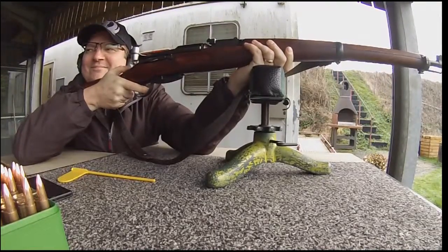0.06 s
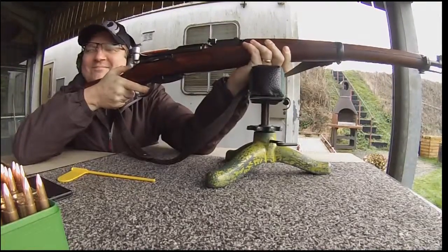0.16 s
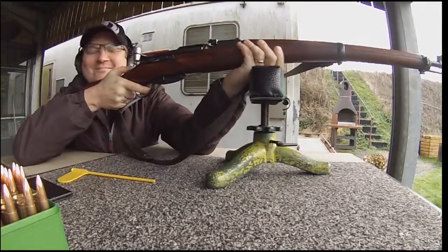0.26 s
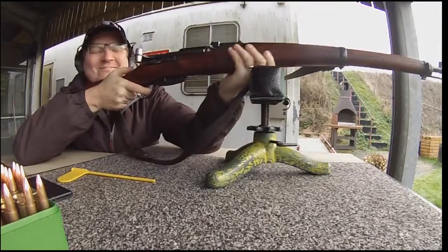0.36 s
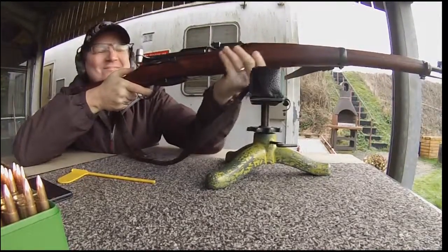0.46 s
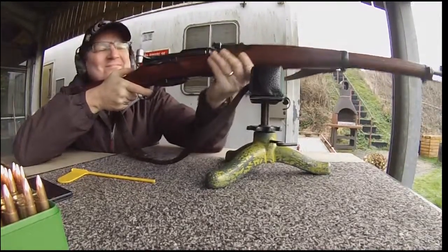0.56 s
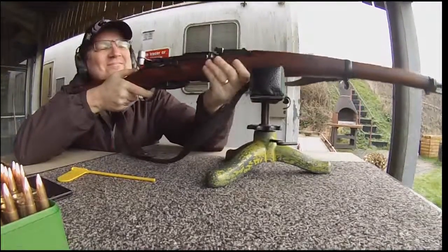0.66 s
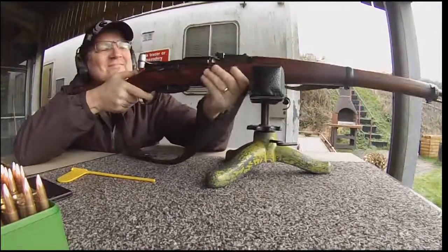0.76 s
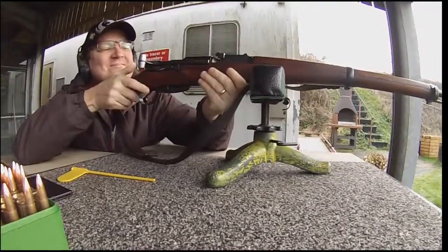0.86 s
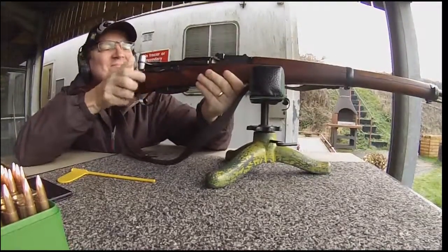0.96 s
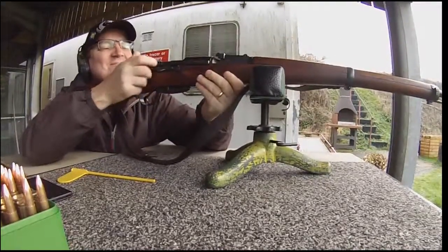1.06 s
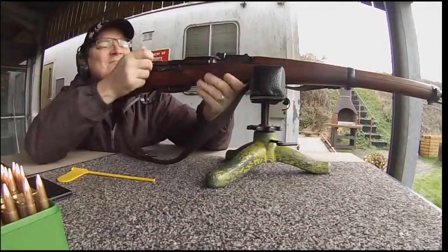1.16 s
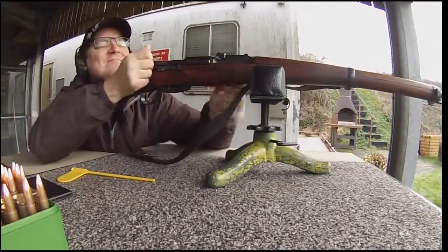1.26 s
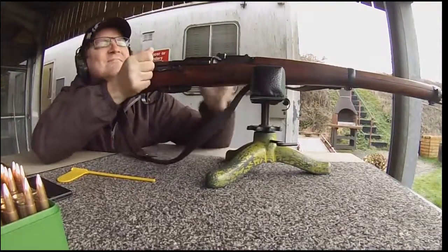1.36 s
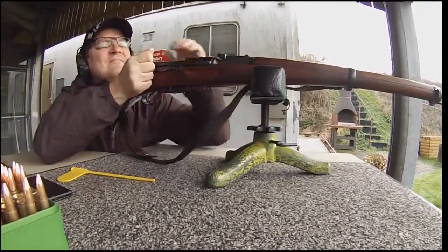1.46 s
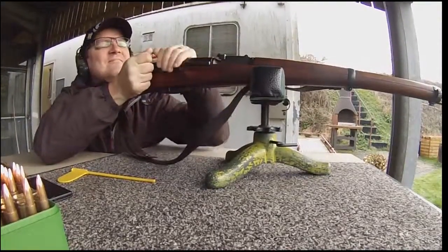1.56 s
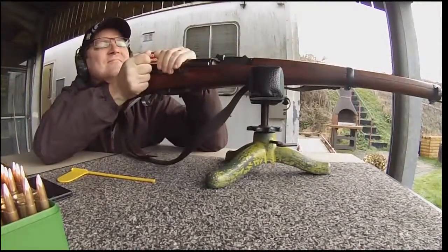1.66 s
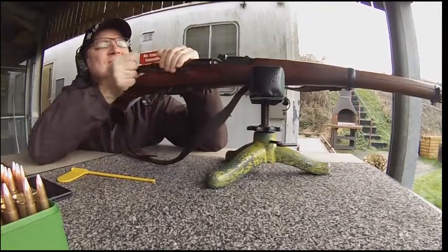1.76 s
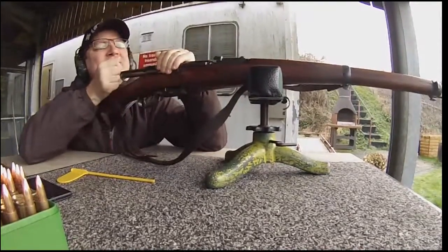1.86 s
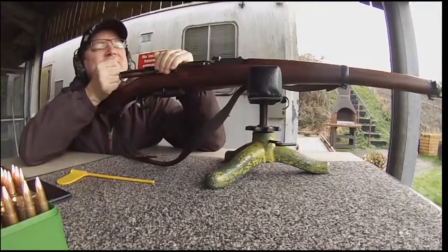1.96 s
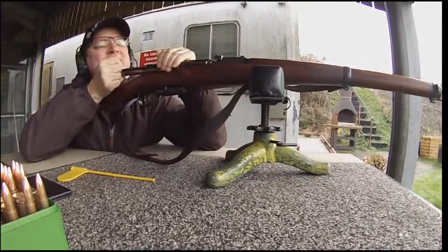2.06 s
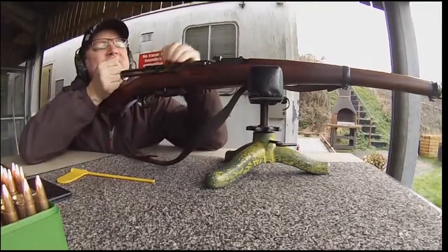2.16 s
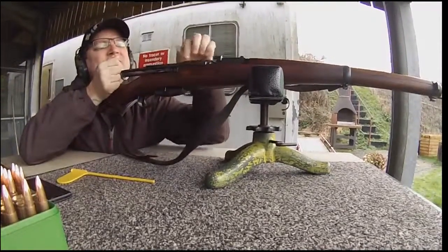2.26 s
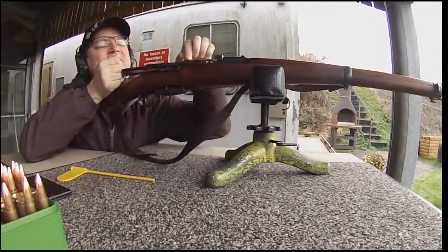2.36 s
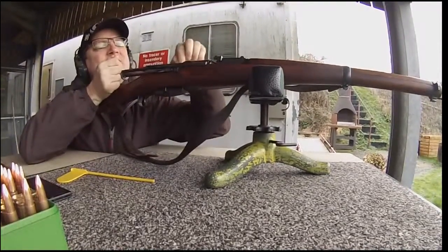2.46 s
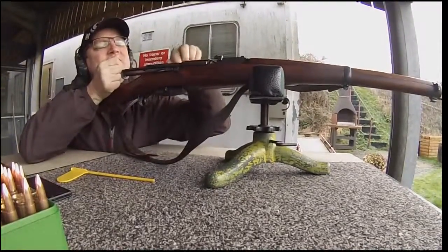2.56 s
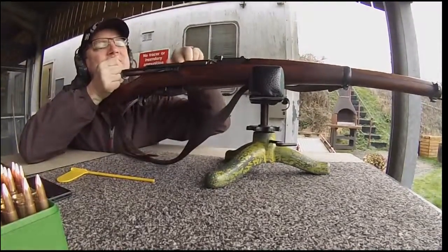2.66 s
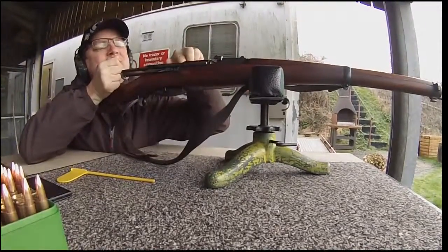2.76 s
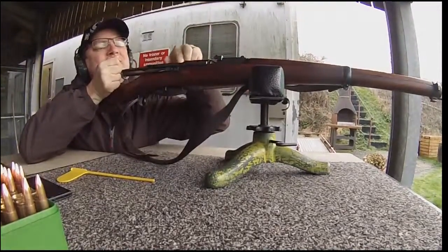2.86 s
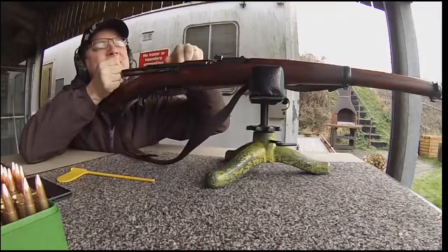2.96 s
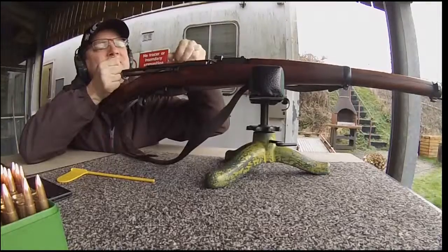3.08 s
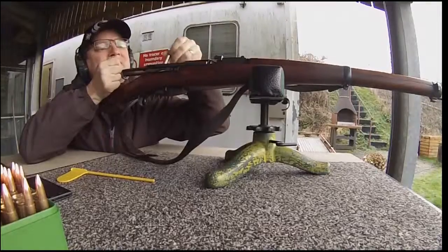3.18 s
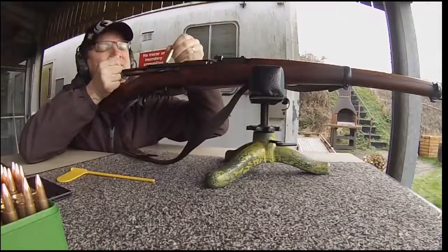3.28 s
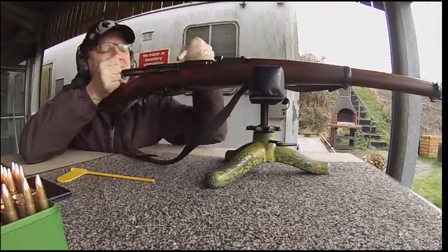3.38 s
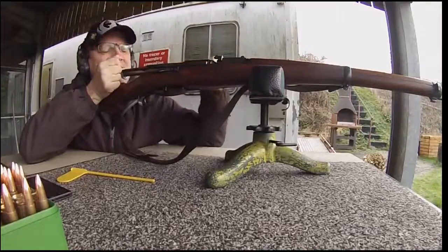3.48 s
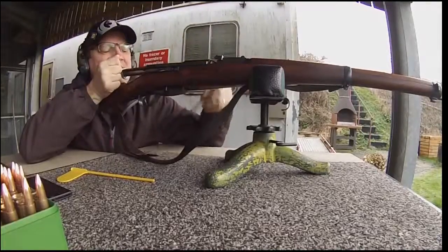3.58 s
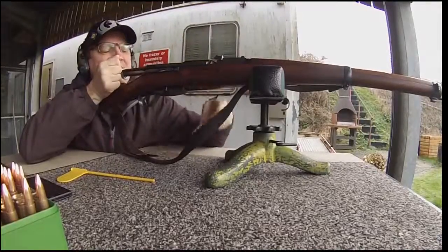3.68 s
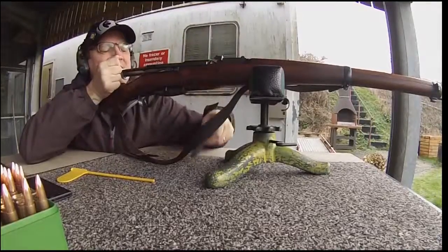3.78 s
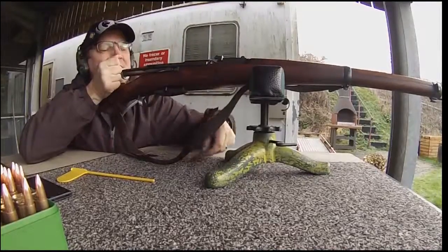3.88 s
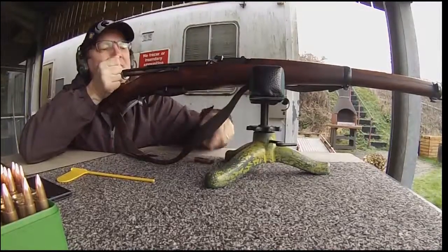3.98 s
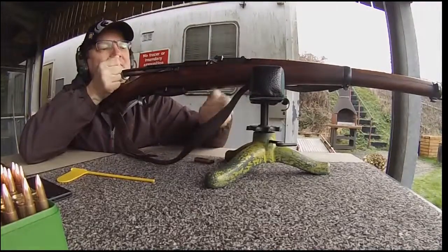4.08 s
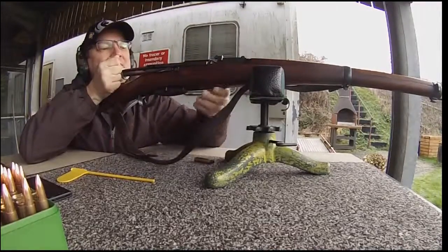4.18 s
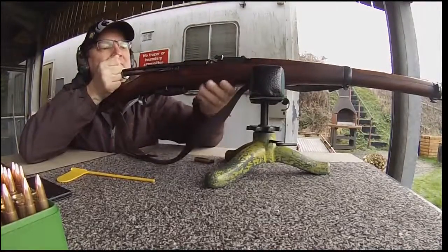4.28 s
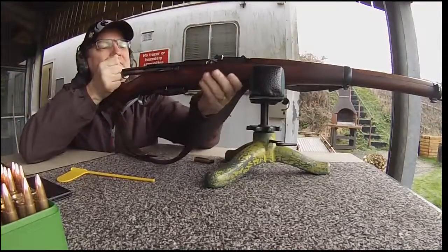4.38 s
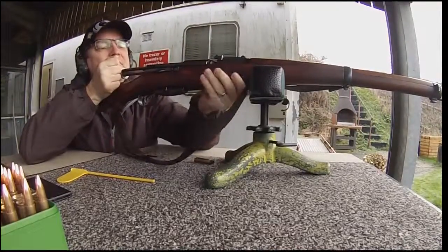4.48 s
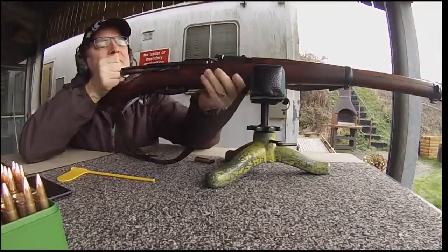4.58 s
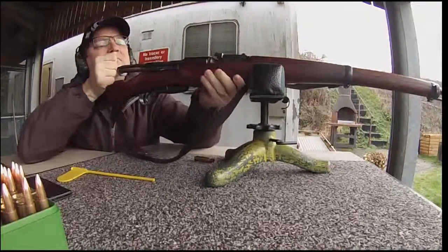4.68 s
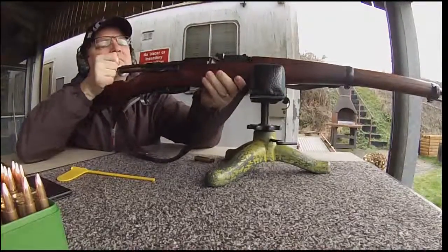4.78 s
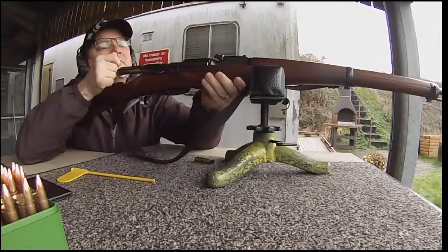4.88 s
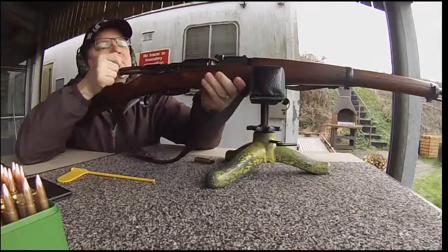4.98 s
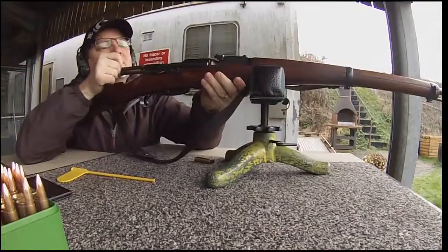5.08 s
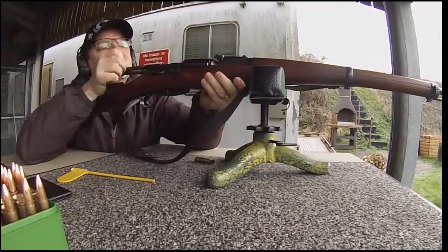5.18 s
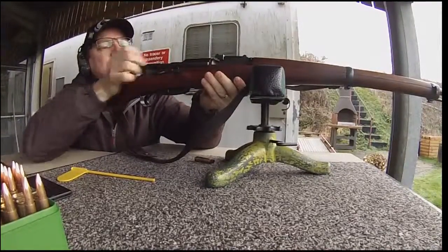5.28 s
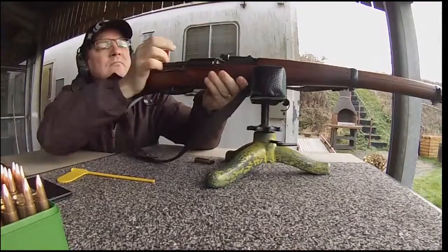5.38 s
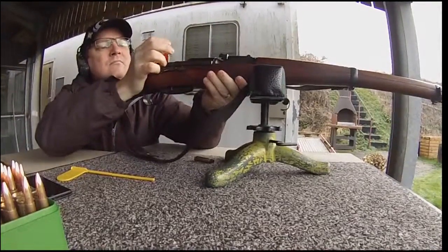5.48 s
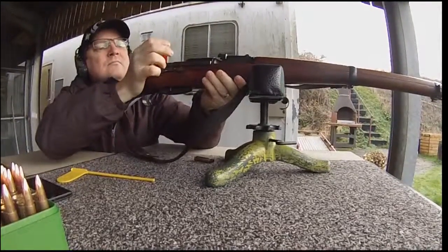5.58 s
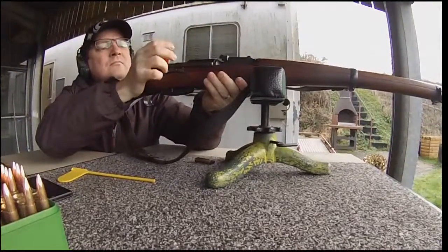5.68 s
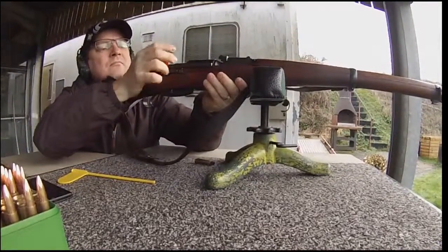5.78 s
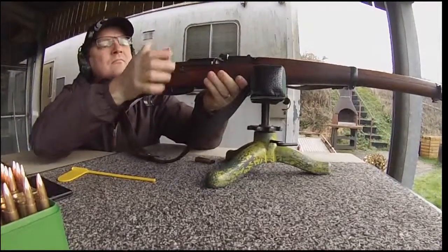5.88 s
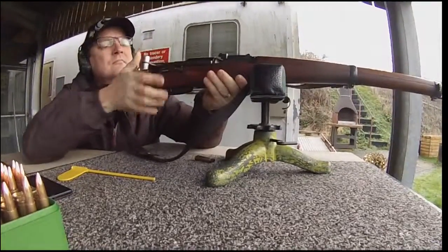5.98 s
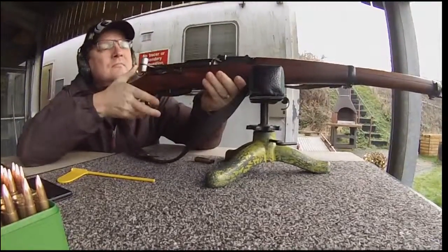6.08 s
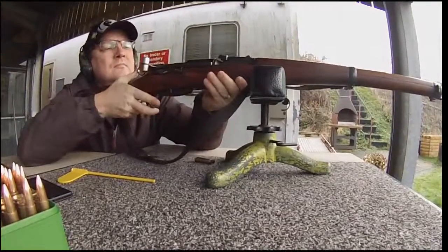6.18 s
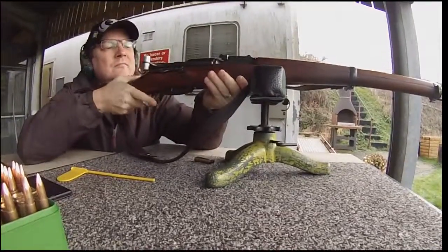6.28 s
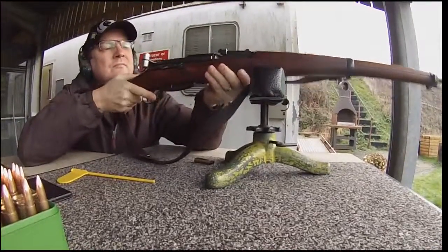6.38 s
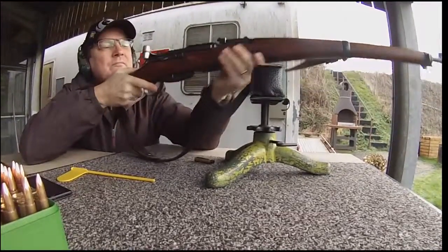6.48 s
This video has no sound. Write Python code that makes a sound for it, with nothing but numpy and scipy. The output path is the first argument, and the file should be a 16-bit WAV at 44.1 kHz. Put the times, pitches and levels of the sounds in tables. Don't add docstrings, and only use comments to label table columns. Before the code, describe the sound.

A rifle bolt clacks back sharply, thin brass rings, a distant shot rolls away, then the bolt slams home and locks amid hollow bench knocks.

```python
import sys
import numpy as np
from scipy import signal
from scipy.fft import rfft, irfft
from scipy.io import wavfile
from scipy.ndimage import uniform_filter1d

SR = 44100
rng = np.random.default_rng(int(sys.argv[2]) if len(sys.argv) > 2 else 0)


def magnitude_from_level(level_db):
    exponent = np.asarray(level_db, float) / 20
    return 10 ** exponent


def unload_wav(signal):
    wavfile.write(
        sys.argv[1],
        SR,
        np.round(np.clip(np.atleast_2d(signal).T, -1, 1) * 32767).astype(np.int16),
    )


N = 288237
T = np.arange(N) / SR


def unit(x):
    return x / np.sqrt(np.mean(x ** 2))


def band(x, hz, width):
    return signal.lfilter(*signal.iirpeak(hz, hz / width, SR), x)


def colour(x, peaks):
    total = 0
    for hz, width, db in peaks:
        once = band(x, hz, width)
        twice = band(once, hz, width)
        total = total + magnitude_from_level(db) * band(twice, hz, width)
    return total


def ring(x, modes):
    total = 0
    for hz, db, t60 in modes:
        pole = np.exp(2j * np.pi * hz / SR - np.log(1000) / (t60 * SR))
        total = total + magnitude_from_level(db) * signal.lfilter([1], [1, -pole], x).imag
    return total


def add(out, s, x, db):
    i = int(s * SR)
    out[i:i + len(x)] += (x * magnitude_from_level(db) / np.abs(x).max())[:N - i]


def walk(rate):
    hold = int(SR / rate)
    levels = np.repeat(rng.standard_normal(N // hold + 1), hold)
    return uniform_filter1d(levels, hold)[:N]


def swell(s, db, rise_s, fall_s):
    return magnitude_from_level(db - 20 * np.maximum((s - T) / rise_s, (T - s) / fall_s))


# frequency in Hz, density in dB per Hz.
HISS = [(15, -28.5), (25, 9.5), (55, -5.5), (249, -4.5), (624, -11), (988, -12.5), (1230, -16), (1940, -15),
        (2410, -18), (3340, -20), (4490, -23), (13600, -30.5), (16000, -60)]


def hiss():
    hz, db = np.transpose(HISS)
    f = np.fft.rfftfreq(N, 1 / SR) + 1
    shape = magnitude_from_level(np.interp(np.log(f), np.log(hz), db))
    return magnitude_from_level(-61) * unit(irfft(rfft(rng.standard_normal(N)) * shape, N))


# time in seconds, sway in dB, boom in dB.
SHOVES = [(.05, -72, -58), (.53, -40, -41), (0.648, -39, -35.5), (.76, -46.5, -62), (1.58, -42.5, -48),
          (1.8, -45, -45), (1.979, -33, -36.5), (2.11, -50, -41), (2.279, -40, -34.5), (2.42, -50.5, -44),
          (4.642, -42, -40.5), (4.769, -35, -33.5), (4.89, -57, -42.5), (5.2, -51, -67.5),
          (5.37, -54, -38.5), (5.43, -47, -46.5), (5.572, -36, -31.5), (5.68, -37, -38), (5.84, -33, -32.5),
          (5.941, -43, -35.5), (6.06, -31.5, -31.5), (6.209, -36.5, -39.5), (6.36, -54, -47.5)]
# time in seconds, level in dB.
REST_ROCKS = [
    (0.049, -43.5),
    (.19, -49.5),
    (.9, -51),
    (1.42, -54),
    (1.9, -34),
    (5.2, -57),
    (5.37, -40),
    (5.44, -40),
]
# frequency in Hz, width in Hz.
BOARD_BANDS = [(47, 26), (115, 40)]


def bench():
    rise_s, sway_fall_s, boom_fall_s, rest_fall_s = 0.017, 0.16, 0.083, 0.043
    sway = magnitude_from_level(-65) + sum(swell(s, db, rise_s, sway_fall_s) for s, db, _ in SHOVES)
    boom = magnitude_from_level(-68.5) + sum(swell(s, db, rise_s, boom_fall_s) for s, _, db in SHOVES)
    rock = sum(swell(s, db, rise_s, rest_fall_s) for s, db in REST_ROCKS)
    rumbles = []
    for hz, width in BOARD_BANDS + [(84, 40)]:
        rumbles.append(unit(band(band(rng.standard_normal(N), hz, width), hz, width)))
    low, high, rest = rumbles
    return magnitude_from_level(-4) * sway * low + magnitude_from_level(-0.5) * boom * high + rock * rest


# time in seconds, half length in seconds.
GUSTS = [(0.196, 0.033), (0.597, 0.15), (1.063, .039), (1.468, 0.014), (1.978, 0.24), (2.554, 0.064),
         (2.95, 0.064), (3.144, 0.058), (3.372, 0.051), (3.717, 0.049), (3.94, 0.058), (4.501, 0.061),
         (4.85, 0.21), (5.134, 0.056), (5.37, 0.15), (5.592, 0.27), (5.996, 0.25), (6.353, 0.09)]


def wind():
    gust = sum(magnitude_from_level(-59.5) * np.exp(-((T - s) / half) ** 4) for s, half in GUSTS)
    flutter = magnitude_from_level(3 * walk(90))
    puffs = colour(rng.standard_normal(N), [(277.8, 1200, 7.0), (726, 1400, -13.5)])
    return gust * unit(puffs * flutter)


# frequency in Hz, width in Hz, level in dB.
PORT = [(1750, 490, -1.5), (2480, 560, -18.5), (2936, 970, 6), (3357, 1230, 12.5), (4500, 3600, -30.5)]
# frequency in Hz, width in Hz, level in dB.
TREBLE = [(5300, 1500, 1), (6800, 2200, 0), (8600, 2600, -3), (10500, 2600, -10), (12300, 2600, -12),
          (14000, 2200, -17)]
# time in seconds, level in dB, rise and fall in seconds.
RUBS = [(.33, -59.5, 0.21, 0.15), (0.922, -57.5, 0.0049, 0.099), (1.1, -89, 0.22, 0.19),
        (1.55, -56.5, 0.62, 0.37), (1.92, -41.5, 0.16, 0.21), (3.335, -55, 0.055, .012),
        (4.05, -59.5, 0.32, 0.15), (4.47, -82, 0.11, .1), (4.85, -65.5, 0.53, 0.52),
        (5.6, -48.5, 0.32, 0.19), (6.4, -59, 0.025, 0.18)]


def rub():
    pressure = magnitude_from_level(-68.5) + sum(swell(*row) for row in RUBS)
    grit = rng.standard_normal(N) * magnitude_from_level(3.5 * walk(170))
    bright = colour(grit, TREBLE[:3] + [(1750, 490, 4.3)])
    return magnitude_from_level(-3.5) * pressure * unit(colour(grit, PORT) + magnitude_from_level(-2.5) * bright)


def strike(blow, modes, crack):
    chance = rng.standard_normal((len(modes), 2)) * [.015, 3]
    struck = [(hz * (1 + a), db + b, t60) for (hz, db, t60), (a, b) in zip(modes, chance)]
    return crack * blow + ring(blow, struck)


# time in seconds, peak in dB, tick in dB, bench thump in dB.
HARD_STOP = [(0.511, -23.5, -14.5, 7), (0.589, -30, -13, -1), (0.638, -10, -16.5, -0.5),
             (0.713, -41.5, -24, 10), (0.747, -30, -16, 9.5), (1.56, -46, 2, 18), (1.768, -39.5, -9, 15),
             (2.079, -24, -9, -23), (2.18, -46, -2.5, 13), (2.241, -27, -3.5, -25),
             (2.383, -26.5, -5.5, -12), (2.455, -36, -13, -25.5), (4.628, -38, -10, 9),
             (4.648, -25, -16, 1), (4.7467, -10, -36, -6), (4.777, -18.5, -34, 6), (4.857, -38.5, -8, 11),
             (4.884, -31.5, -18, 9.5), (5.706, -17, -15, 0.5), (5.784, -21, -33, 1), (5.839, -13, -16, 4),
             (5.943, -22.5, -18, -1.5), (6.031, -26.5, -8, 2), (6.065, -16.5, -16.5, -1),
             (6.161, -35, -11.5, 6.5), (6.187, -21.5, -22, 5.5), (6.266, -42.5, -1.5, 0),
             (6.32, -34, -1.5, 3)]
# time in seconds, peak in dB, mid knock in dB, bench thump in dB.
SOFT_STOP = [(0.598, -25.5, -15, 7), (1.941, -27.5, -23, 10.5), (1.963, -16.5, -8.5, -27),
             (2.014, -25.5, -3, 2.5), (2.033, -34.5, -6, 7.5), (2.112, -28, -30, 7.5),
             (2.276, -29.5, -23, 10.5), (2.352, -36, -18, -15), (2.419, -26.5, -15, 6.5),
             (4.637, -38.5, -2.5, -9), (4.861, -38, -7, 11), (5.562, -19.5, -20.5, -3),
             (5.612, -27, -19, 9.5), (5.655, -28.5, -7, -1), (5.6716, -19.5, -11, 4),
             (5.677, -19, -29, -21), (5.798, -22, -8, -11), (5.907, -29.5, -8, -15), (5.924, -16.5, -9, 2),
             (5.972, -36, -7, 10), (6.049, -16, -8, 2), (6.199, -23.5, -25.5, -22), (6.308, -41, -11, -19),
             (6.368, -38, -25, 14)]
# frequency in Hz, level in dB, 60 dB decay in seconds.
CASE_LOW = [(521, 2, 0.068), (776, 14.5, 0.012), (971, 1, 0.033), (1120, -2.5, 0.031), (1274, 10.5, 0.01),
            (1375, -15.5, 0.0081), (1675, 12.5, 0.012)]
# frequency in Hz, level in dB, 60 dB decay in seconds.
CASE_MID = [(2158, 7, 0.029), (2518, 14, 0.015), (3160, 8, 0.0088), (3435, -0.5, 0.0019), (4460, 1, 0.005)]
# frequency in Hz, level in dB, 60 dB decay in seconds.
CASE_TICK = [(5500, -4, .005), (6200, -5, .005), (6850, 0, .007)]
# frequency in Hz, level in dB, 60 dB decay in seconds.
CASE_RING = [(1120, 6, .045), (1870, -5, .12), (2150, -15, .04), (2680, -5, .13)]
# frequency in Hz, level in dB, 60 dB decay in seconds.
BENCH_MODES = [(47.8, 4.5, 0.36), (118.3, 8.5, 0.07), (200, -1, 0.059), (315, 7, 0.019)]


def rattle():
    out, t = np.zeros(N), T[:6000]
    hard = [(s, db, -6.5, tick_db, thump_db, 1278, 1) for s, db, tick_db, thump_db in HARD_STOP]
    soft = [(s, db, mid_db, -32, thump_db, 2050 + 24.5 * db, -1) for s, db, mid_db, thump_db in SOFT_STOP]
    for s, db, mid_db, tick_db, thump_db, knock_hz, side in hard + soft:
        press = np.exp(-t / 0.003) + 0.1 * np.exp(-t / .012) - 1.08 * np.exp(-t / 0.000053)
        blow = rng.standard_normal(len(t)) * press
        blow[3] += side * 7.74
        low = strike(blow, CASE_LOW, 43.0)
        mid = strike(blow, CASE_MID, 45.0)
        tick = strike(blow, CASE_TICK, 6.4)
        add(out, s, colour(low, [(knock_hz, 1900, 0), (600, 1200, -17)]), db - 6.5)
        add(out, s, colour(mid, [(2620, 4670, 0)]), db + mid_db - 4.0)
        add(out, s, colour(tick, [(5870, 6600, 0)]), db + tick_db - 4.5)
        add(out, s, colour(blow, PORT[1:]), db + tick_db - 4)
        shove = side * (np.exp(-t / 0.0008) - np.exp(-t / 0.000057))
        if side > 0:
            add(out, s, ring(np.diff(shove), CASE_RING), db - 18)
        add(out, s, shove + 0.0047 * ring(shove, BENCH_MODES), db + thump_db - 10.0)
    return signal.sosfilt(signal.butter(8, 7300, fs=SR, output="sos"), out)


# start in seconds, length in seconds, first and last level in dB.
CHATTER = [
    (1.604, 0.034, -48, -51),
    (1.81, 0.053, -30, -49),
    (1.908, 0.062, -32, -57),
    (1.998, .06, -51, -63),
    (2.94, .02, -55.5, -67),
    (3.289, 0.048, -38.5, -49.5),
    (5.323, .03, -33, -27),
    (5.383, 0.015, -33, -32),
    (5.425, 0.02, -25, -26.5),
]


def chatter(count=8):
    rows = []
    for start, length, first_db, last_db in CHATTER:
        for k, (late, loud, bright) in enumerate(rng.uniform(-1.1, 1, (count, 3))):
            u = (k + .5 + 0.43 * late) / count
            peak_db = first_db + u * (last_db - first_db) + 4 * loud
            rows.append((start + u * length, peak_db, -18 + 4 * bright, 2.9, -13))
    return rows


# time in seconds, peak in dB, treble in dB, burst in ms.
OPENING = [(0.9213, -46, -17, 2.3), (1.1396, -50, -26, 1.5), (1.6125, -38, -11, 2.2),
           (1.7314, -25.5, -24, 4.5), (1.7593, -38.5, -13, 2.1), (1.773, -41, -13.5, 2.1),
           (1.783, -39.5, -18.5, 2.1), (1.7965, -11, -11, 3.5), (1.8015, -18, -20, 3.5),
           (1.8128, -29, -21, 1.5), (1.880, -33, -14, 3.), (1.8837, -26.5, -6.5, 2.2),
           (1.8872, -4.5, -14.5, 3.8), (1.8921, -23, -1.5, 3.), (1.8963, -18, -16, 1.5),
           (1.9032, -13.5, -22, 2.8), (1.9088, -17, -22.5, 2.6), (1.995, -19, -18, 3.),
           (2.7628, -37, -5, 1.43), (2.9315, -33, -5.5, 4.8), (3.2836, -35.5, -13, 2.3),
           (3.3224, -45, 0, 1.8)]
# time in seconds, peak in dB, treble in dB, burst in ms.
CLOSING = [(5.1827, -35, -14, 2.4), (5.2823, -26.5, -13.5, 7), (5.298, -27, -21, 1.6),
           (5.315, -41.5, -19.5, 5.), (5.3557, -3.5, -17.5, 4.2), (5.3608, -17.5, -16.5, 3.1),
           (5.3702, -12.5, -15.5, 3.6), (5.3767, -11, -19, 4.8), (5.3834, -14.5, -21, 3.3),
           (5.4032, -1, -13.5, 2.4), (5.4055, -4.5, -8.5, 1.5), (5.4088, -13.5, -17.5, 1.6),
           (5.4119, -22, -15.5, 1.3), (5.4167, -4, -13, 3.1), (5.4207, -7, -14.5, 2),
           (5.431, -26, -11.5, 3.5)]
# frequency in Hz, level in dB, 60 dB decay in seconds.
BOLT = [(1730, -3.5, .2), (3110, -6, .1), (3144, -25, 0.15), (3370, -14.5, 0.053), (3530, 6.5, 0.048),
        (3585, -20.5, 0.069), (4150, -12, 0.09), (5120, -17.5, .25), (5530, -11, 0.28), (6620, -6, 0.31),
        (7756, -21.5, .2)]


def steel():
    out, t = np.zeros(N), T[:1500]
    events = [(*row, -26) for row in OPENING + CLOSING] + chatter()
    contact = rng.standard_normal((len(events), len(t)))
    for (s, db, treble_db, ms, low_db), noise in zip(events, contact):
        u = t * 1000 / ms
        press = (1 - np.exp(-u / 0.51)) * (np.exp(-1.2 * u ** 3) + 0.12 * np.exp(-u / 2.9))
        squeal = 0.6 * np.sin(2 * np.pi * (3300 + 170 * noise[0]) * t)
        start = s - .0008
        add(out, start, colour((noise + squeal) * press, PORT[1:]), db)
        add(out, start, colour(noise * press, PORT[:1]), db + low_db + 3.5)
        add(out, start, colour(noise * press, TREBLE), db + treble_db + 6.0)
    return out + magnitude_from_level(-54.5) * ring(out, BOLT)


def roof(x):
    t = T[:int(.6 * SR)]
    noise = rng.standard_normal(len(t)) * np.minimum(t / 0.004, 1) * magnitude_from_level(-60 * t / 0.45)
    dull = signal.lfilter(*signal.butter(1, 5000, fs=SR), noise)
    tail = dull + (noise - dull) * magnitude_from_level(-90 * t)
    return signal.fftconvolve(x, tail / np.sqrt(np.sum(tail ** 2)))[:N] * magnitude_from_level(-14.5)


# time in seconds, peak in dB.
BRASS_HITS = [
    (1.905, -49),
    (1.925, -52),
    (1.995, -63),
    (2.762, -81),
    (2.934, -85),
]
# frequency in Hz, level in dB, 60 dB decay in seconds.
BRASS = [(8750, 2, .14), (8790, -2, .11), (11620, 0, .14), (11655, -3, .12), (13550, -1, .1),
         (13600, -5, .09)]


def brass():
    blows = np.zeros(N)
    for s, db in BRASS_HITS:
        blows[int(s * SR)] = magnitude_from_level(db)
    return ring(blows, BRASS)


def far_shot():
    start_s, t60_s = 2.692, 1.1
    t = np.maximum(T - start_s, 0)
    fade = (t > 0) * magnitude_from_level(-60 * t / t60_s + 1.5 * walk(40) + 2.2 * walk(220))
    roll = rng.standard_normal(N) * fade
    body = colour(roll, [(514, 1800, 9.5), (1350, 1700, -4.0), (5000, 3900, -3)])
    return magnitude_from_level(-46) * (colour(roll, PORT) + magnitude_from_level(-1) * body)


def scene():
    background = hiss() + bench() + wind() + rub()
    knocks = rattle()
    air = steel() + brass()
    return (background + knocks + air + roof(air) + far_shot())[None]


def band_limit(x):
    return signal.sosfilt(signal.butter(12, 16500, fs=SR, output="sos"), x)


def record(dry):
    x = signal.sosfilt(signal.butter(3, 34, "high", fs=SR, output="sos"), dry)
    x = np.tanh(x / 1.05) * 1.05
    x = signal.sosfilt(signal.ellip(6, .3, 60, 15600, fs=SR, output="sos"), x)
    return band_limit(x)


dry = scene()
out = record(dry)
unload_wav(out)
```